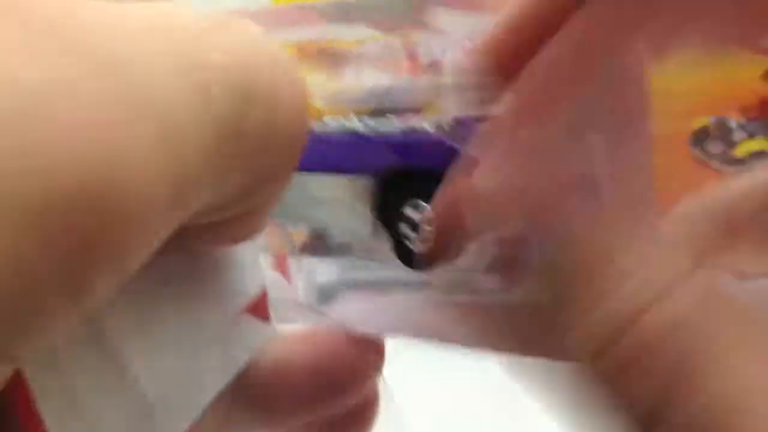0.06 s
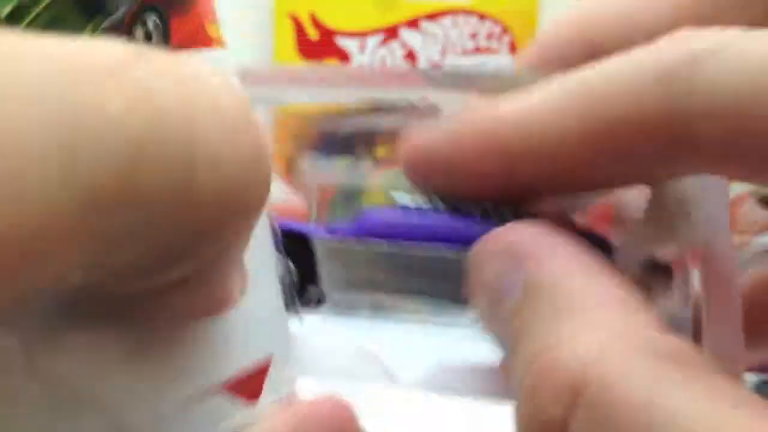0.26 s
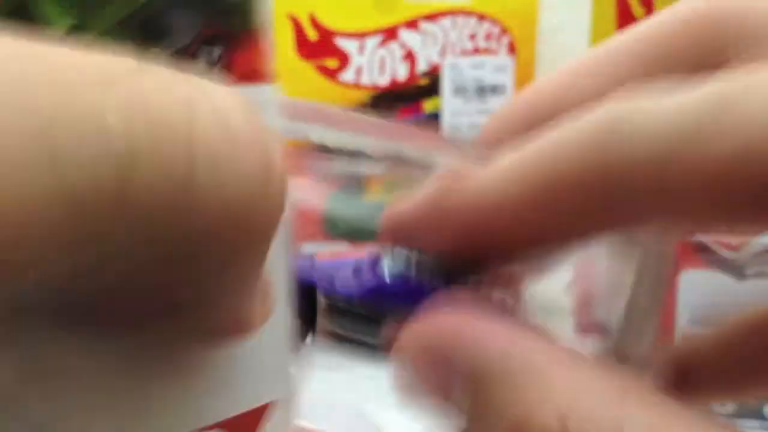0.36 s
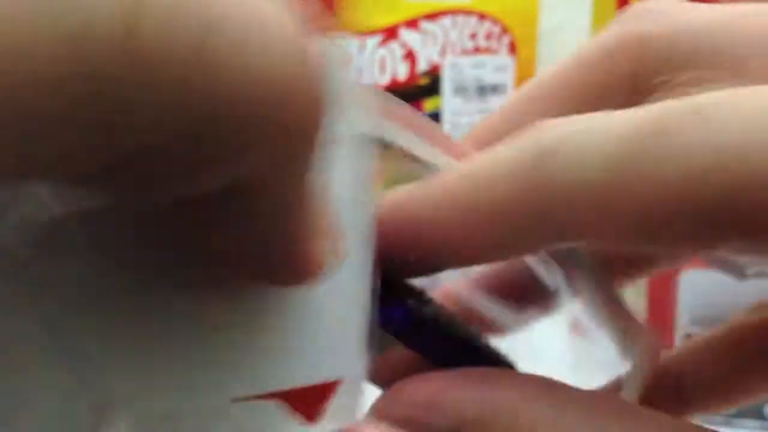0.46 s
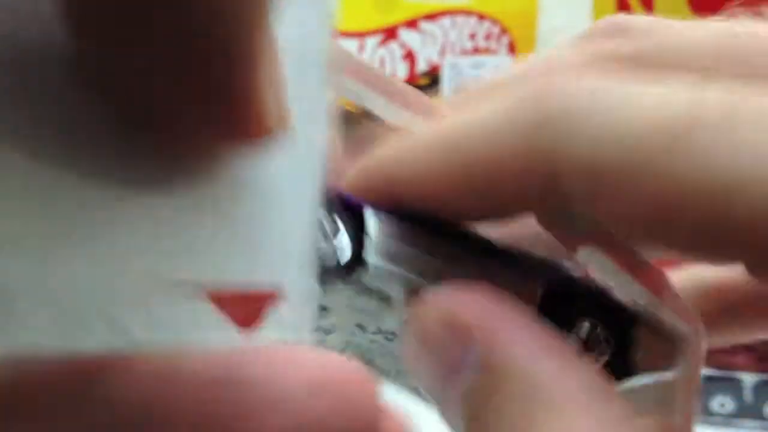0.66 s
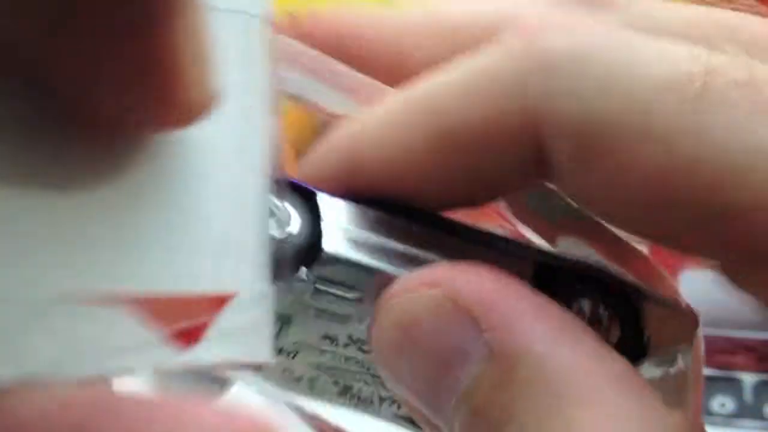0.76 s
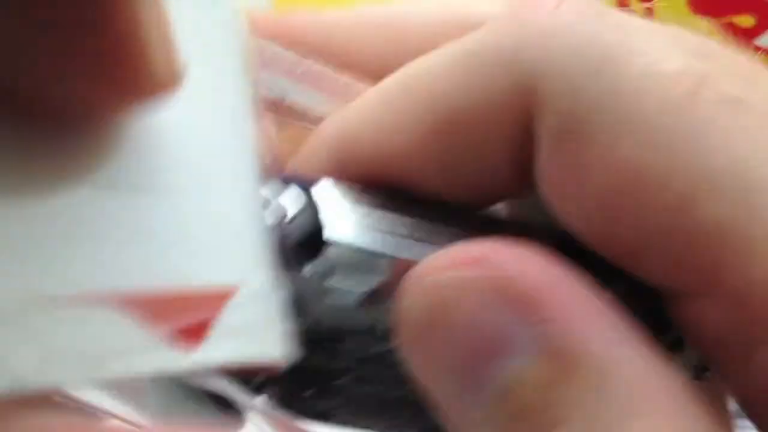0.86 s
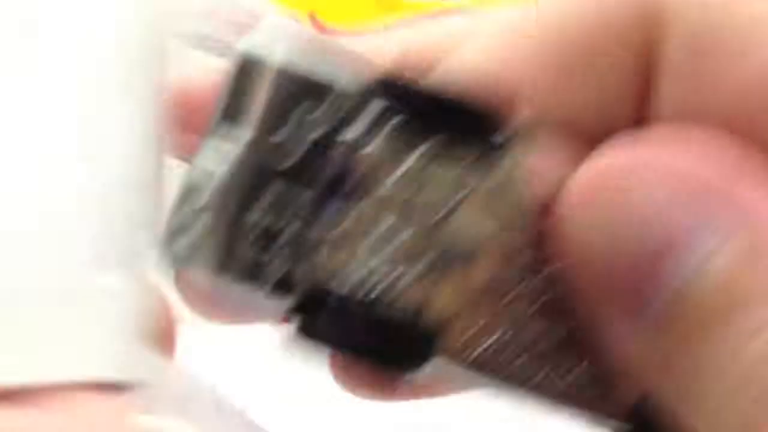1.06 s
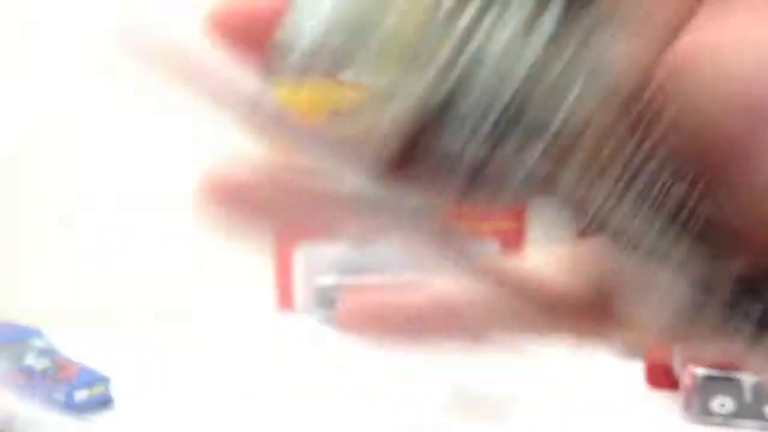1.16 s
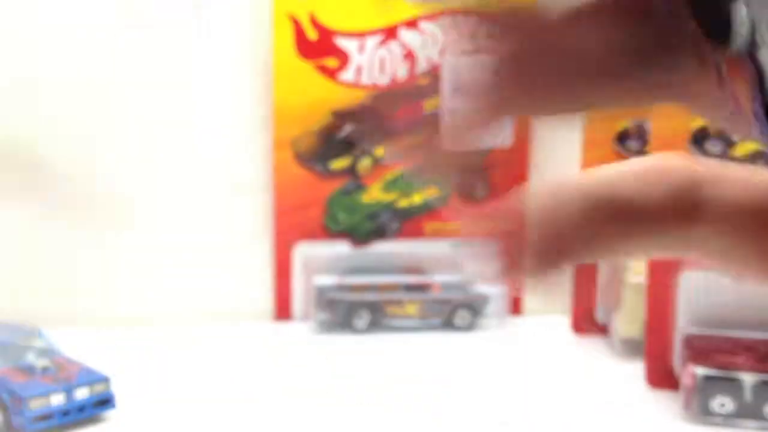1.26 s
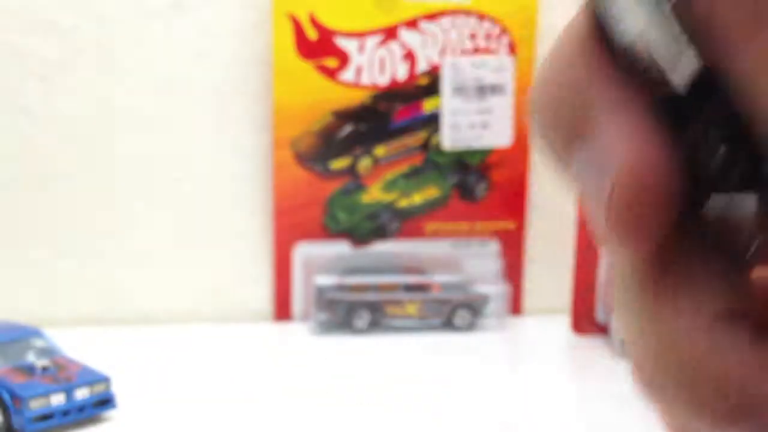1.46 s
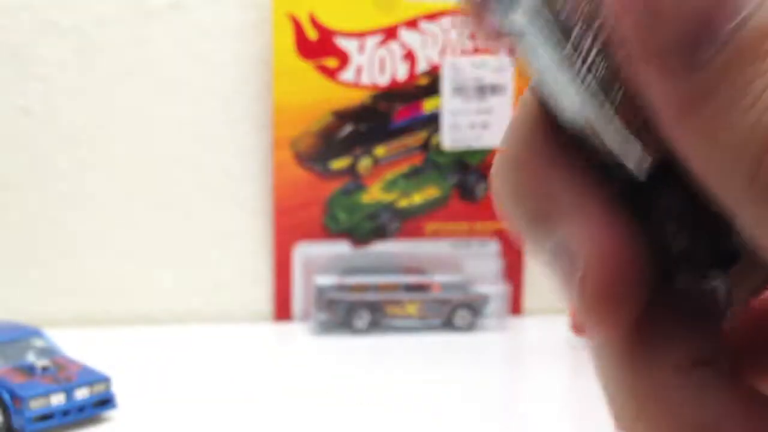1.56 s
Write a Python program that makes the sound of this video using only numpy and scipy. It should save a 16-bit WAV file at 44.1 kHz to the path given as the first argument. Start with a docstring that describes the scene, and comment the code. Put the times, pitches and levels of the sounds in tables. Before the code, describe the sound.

Plastic packaging is cracked open by hand, crackling and popping, then a metal toy car pings.

```python
"""Card and film rustle under the fingers; then a plastic shell snaps off its card and its dents pop. Later come
dry thin clicks, some on the shell and some on a metal toy car, which is also tapped and pings, close by in a
small quiet room. Rustle is many tiny grains mixed with noise, and snaps are noise bursts through the shell's
resonances. Pops and pings are fading sine waves, clicks are thin noise bursts, and taps add a rattling ring. A
short echo tail and faint air noise lie behind them."""
import sys
import numpy as np
from scipy import signal
from scipy.fft import rfft, irfft, next_fast_len
from scipy.io import wavfile
from scipy.ndimage import uniform_filter1d

SR = 44100
rng = np.random.default_rng(int(sys.argv[2]) if len(sys.argv) > 2 else 0)


def volts(x):
    """Linear amplitude factor 10**(x/20) for a level x in dB, scalar or array-like."""
    e = np.asarray(x, float) / 20
    return 10 ** e


def put_to_file(sound):
    """Save the sound as 16-bit audio at rate SR, in the file named by the first command-line argument."""
    columns = np.atleast_2d(sound).T  # one column per channel
    safe = np.clip(columns, -1, 1)
    whole_steps = np.round(safe * 32767)
    wavfile.write(sys.argv[1], SR, whole_steps.astype(np.int16))


N = 70560  # samples, 1.6 s

# The shell breaks: start_s, peak_db, tilt_db_per_octave, burst_t60_s (time to fall 60 dB)
SHELL_SNAPS = [(.2485, -3.5, 2.5, 0.017), (.4248, -5.5, 1, 0.024), (1.051, -16, 5, 0.034),
               (.579, -24, -2, 0.022)]
# Resonances of the stiff shell: centre_hz, width_hz, level_db
SHELL_MODES = [(684, 265, 1.5), (890, 420, -1.5), (1250, 360, -3), (2046, 464, 3), (4500, 1270, -4.5),
               (5670, 1300, -7.5), (7220, 870, -8.5), (7990, 1500, -14.5), (10020, 1400, -15.5),
               (12900, 1700, -21.5)]
# Dents flip over: start_s, peak_db, pitch_hz, fade_cycles (to fall 30 dB)
DENT_POPS = [(0.187, -24.5, 1250, 4), (.239, -19.5, 980, 4.4), (.2486, -3.5, 3950, 12),
             (0.2486, -17.5, 857, 7.7), (0.383, -24.5, 2097, 3.2), (.399, -22.5, 618, 2.8),
             (.425, -13.5, 640, 2.4), (0.4255, -6, 2210, 11.8), (0.4258, -14.5, 1270, 4.4),
             (.473, -14.5, 1355, 6.6), (.574, -30.5, 2040, 21), (0.638, -33, 605, 7.1),
             (0.65, -23, 1420, 9.4), (1.051, -19, 1374, 6.5), (1.058, -23, 1700, 6.4),
             (1.122, -25.5, 210, 3), (1.162, -17.5, 646, 3.5), (1.163, -23, 976, 30),
             (1.163, -21, 1880, 29), (1.165, -26.5, 189, 4.3), (1.46, -35.5, 1320, 4)]
# A dent swells and is stopped by a finger: start_s, peak_db, pitch_hz, length_s
STOPPED_DENTS = [(0.5456, -21.5, 1490, .0052), (0.9759, -14.5, 1234, 0.00426)]
# Dry thin clicks, some on the shell and some on the car: start_s, peak_db, low_edge_hz, t60_s
DRY_CLICKS = [(0.8948, -31, 5000, 0.0068), (1.0444, -23, 2500, .02), (1.0823, -20.5, 3000, 0.015),
              (1.1611, -9.5, 4950, 0.0074), (1.173, -17.5, 3470, 0.007), (1.4598, -31.5, 1490, .007),
              (1.4989, -23.5, 1670, 0.019)]
CLICK_TOP_HZ = 8200
# Fingers drag, bend and tear: start_s, length_s, card_db, film_db
FINGER_STROKES = [(0, 0.41, -54.5, -58), (0.023, 0.014, -44, -54), (0.044, 0.053, -51, -49),
                  (0.151, 0.068, -42.5, -43.5), (0.222, 0.09, -46, -47), (0.314, 0.06, -49.5, -47),
                  (0.379, 0.029, -39.5, -41.5), (0.42, 0.073, -40, -42.5), (0.51, 0.1, -48, -59),
                  (0.571, 0.036, -38.5, -45.5), (0.644, 0.05, -48, -56.5), (0.712, 0.15, -57, -69),
                  (0.842, 0.05, -53.5, -61), (0.902, 0.056, -53, -48), (0.943, 0.085, -45, -45),
                  (1.029, 0.011, -36.5, -39), (1.044, 0.013, -33, -30.5), (1.068, 0.025, -42, -39.5),
                  (1.105, 0.039, -38, -39.5), (1.116, 0.012, -32, -39), (1.156, 0.0059, -31, -44),
                  (1.248, 0.011, -54.5, -43.5), (1.33, 0.022, -77, -40.5), (1.454, 0.021, -51, -57.5),
                  (1.496, 0.039, -46, -52.5), (1.564, 0.016, -57, -54.5)]
STROKE_RISE_S, STROKE_FADE_S = 0.0041, 0.012  # the fade is a time constant
# Colour of the card's creak: pitch_hz, level_db (per Hz)
CARD_COLOUR = [(53, -82), (90, -29.5), (209, 3), (787, -1), (931, 2.5), (1890, 0.5), (2730, -6),
               (3070, -7.5), (5000, -7.5), (6500, -58)]
# Colour of the film's fizz: pitch_hz, level_db (per Hz)
FILM_COLOUR = [(1500, -30.5), (2500, -6.5), (4000, -7), (6600, -3.5), (8600, -7.5), (11000, -5),
               (15100, -9.5), (15600, -41)]
# Small bright ticks of the film: start_s, peak_db, pitch_hz
FILM_TICKS = [(0.0477, -31, 5950), (0.1666, -31.5, 5570), (1.5238, -33.5, 10570)]
TICK_FADE_CYCLES, TICK_SPREAD = 120, 0.15  # cycles to fall 60 dB; spread of the natural log of pitch
# The car is tapped: start_s, crack_peak_db, ring_peak_db
CAR_TAPS = [(1.2527, -16, -22.5), (1.3295, -19.5, -29), (1.3925, -39, -38.5), (1.4005, -40, -42)]
# Ringing tones of the car's body: pitch_hz, level_db
CAR_BODY = [(1400, -7.5), (2140, -3.5), (2520, -2), (3000, -7.5), (3660, -7.5), (4600, 0), (7230, -1.5),
            (8100, -6.5), (8960, -7.5)]
BODY_T60_S, RATTLE_T60_S, CRACK_T60_S, CRACK_LOW_HZ = 0.023, 0.04, 0.008, 1800
# The car's metal is set singing: start_s, peak_db, rub_length_s, tilt_db_per_khz
METAL_PINGS = [(0.485, -32, 0.013, -6), (1.147, -27.5, 0.011, -13), (1.253, -37, 0.012, -1),
               (1.332, -17.5, 0.014, 2)]
# Ringing tones of the metal: pitch_hz, level_db, t60_s
METAL_MODES = [(10090, -13, .18), (11310, 0, .15), (11375, -7, .2), (11620, -16, .13), (10150, -19, .1),
               (14090, -22, .09)]
AFTER_RING_DB = -15  # beside the swell, as the rub ends
# How long the room's tail lasts: pitch_hz, t60_s
ROOM_FADE = [(200, .25), (2000, .2), (6000, .16), (11000, .09)]
ROOM_DB = -16
BASS_CUT_HZ = 134  # small sources radiate little bass
# Colour of the quiet air: pitch_hz, level_db (per Hz)
AIR_COLOUR = [(25, -32), (70, -20), (130, 0), (300, -7.5), (1000, -14.5), (4000, -11.5), (14000, -18),
              (15500, -53)]
AIR_DB = -61.5


def unit(x):
    """Scales a sound to rms 1."""
    return x / np.sqrt(np.mean(x ** 2) + 1e-20)


def peak(x):
    """Scales a sound to peak 1."""
    return x / (np.abs(x).max() + 1e-12)


def along(points, hz):
    """Reads a value between (Hz, value) points, on a log frequency axis."""
    f, v = np.transpose(points)
    return np.interp(np.log(hz + 1), np.log(f + 1), v)


def filtered(x, response):
    """Shapes a sound by a gain and phase given for every frequency."""
    m = next_fast_len(len(x) + 4096)
    return irfft(rfft(x, m) * response(np.fft.rfftfreq(m, 1 / SR)), m)[:len(x)]


def add(track, start_s, sound):
    """Adds a sound to the track at a time, cutting off what runs past the end."""
    part = track[round(start_s * SR):][:len(sound)]
    part += sound[:len(part)]


def shell_response(f):
    """Sums the shell's resonances, each a band-pass, with alternating signs."""
    total = 0
    for k, (centre, width, db) in enumerate(SHELL_MODES):
        band = 1j * f * width / (centre ** 2 - f ** 2 + 1j * f * width)
        total = total + (-1) ** k * volts(db) * band
    return total


def snaps():
    """A short burst of fracture noise rings the stiff shell."""
    out, t = np.zeros(N), np.arange(SR // 10) / SR
    for s, db, tilt_db, t60 in SHELL_SNAPS:
        burst = rng.standard_normal(len(t)) * volts(-60 * t / t60)
        burst[0] += 4  # the first crack
        power = tilt_db / (20 * np.log10(2))  # dB per octave as a power of frequency
        snap = filtered(burst, lambda f: shell_response(f) * (1j * (f + 50) / 2000) ** power)
        add(out, s, volts(db) * peak(snap))
    return out


def pops():
    """Each flipping dent rings a few cycles, with weaker partners below and above its pitch."""
    out, t = np.zeros(N), np.arange(SR // 20) / SR
    for s, db, hz, cycles in DENT_POPS:
        rise = (1 - np.exp(-t * hz / 0.66)) ** 2
        fade = volts(-30 * t * hz / cycles)
        ring = np.sin(2 * np.pi * hz * t)
        ring += 0.19 * np.sin(2 * np.pi * (0.619 * hz * t + rng.random()))
        ring += 0.12 * np.sin(2 * np.pi * (1.664 * hz * t + rng.random()))
        add(out, s, volts(db) * peak(rise * fade * ring))
    return out


def stopped_dents():
    """A dent swells for a few cycles, with a lower and a higher partner, and is cut short."""
    out, t = np.zeros(N), np.arange(SR // 50) / SR
    for s, db, hz, length in STOPPED_DENTS:
        arch = np.sin(np.pi * np.minimum(t / length, 1) ** 1.56)  # late peak, then silence
        ring = np.sin(2 * np.pi * hz * t)
        ring += 0.52 * np.sin(2 * np.pi * 0.57 * hz * t)
        ring -= 0.2 * np.sin(2 * np.pi * 1.57 * hz * t)
        add(out, s, volts(db) * peak(np.sqrt(np.abs(arch)) * ring))
    return out


def thin_burst(t, low_hz, t60):
    """A fading noise burst of peak 1 with its bass and top treble weakened."""
    burst = rng.standard_normal(len(t)) * volts(-60 * t / t60)
    burst[0] += 3

    def response(f):
        low_cut = (1j * f / (low_hz / 2 + 1j * f)) ** 6  # about 6 dB down at low_hz
        return low_cut / (1 + 1j * f / CLICK_TOP_HZ) ** 2
    return peak(filtered(burst, response))


def clicks():
    """Dry thin clicks on the shell or the car, with no ringing body."""
    out, t = np.zeros(N), np.arange(SR // 20) / SR
    for s, db, low_hz, t60 in DRY_CLICKS:
        add(out, s, volts(db) * thin_burst(t, low_hz, t60))
    return out


def crinkle(colour, centre_hz, cycles, spread_db, smooth, count):
    """Short random grains of uneven size on a bed of noise, in one colour."""
    start, pitch, size, phase = rng.random((4, count, 1))
    hz = np.clip(centre_hz * (pitch / (1 - pitch)) ** 0.369, 400, 16000)
    k = np.arange(400)  # samples in a grain
    size_db = spread_db * np.minimum(-np.log(size), 3)  # many small, few large
    fade_db = -60 * k / SR * hz / cycles
    grain = volts(size_db + fade_db) * np.sin(2 * np.pi * (hz * k / SR + phase))
    at = (start * N).astype(int) + k
    grains = np.bincount(at.ravel(), grain.ravel(), N + len(k))[:N]
    # Even out the grains' own colour, then give them the wanted one.
    spectrum = rfft(grains)
    power = uniform_filter1d(np.abs(spectrum) ** 2, size=800)
    white = unit(irfft(spectrum / np.sqrt(np.abs(power) + 1e-9), N))
    mixed = white + smooth * rng.standard_normal(N)
    return unit(filtered(mixed, lambda f: volts(along(colour, f))))


def rustle():
    """Every finger stroke creaks the card and fizzes the film."""
    s, length, card_db, film_db = np.transpose(FINGER_STROKES)[..., None]
    t = np.arange(N) / SR - s
    rise = np.clip(t / STROKE_RISE_S, 0, 1)
    shape = rise * np.exp(-np.maximum(t - length, 0) / STROKE_FADE_S)
    # Overlapping strokes add by power.
    card_level = np.sqrt(np.sum((volts(card_db) * shape) ** 2, axis=0))
    film_level = np.sqrt(np.sum((volts(film_db) * shape) ** 2, axis=0))
    card = crinkle(CARD_COLOUR, centre_hz=1206, cycles=8.4, spread_db=6, smooth=1.0, count=1200)
    film = crinkle(FILM_COLOUR, centre_hz=7000, cycles=14, spread_db=4.5, smooth=0.7, count=3000)
    return card_level * card + film_level * film


def ticks():
    """Each film tick is a cluster of six brief tones round its pitch."""
    out, t = np.zeros(N), np.arange(SR // 50) / SR
    for s, db, hz in FILM_TICKS:
        tones_hz = np.minimum(hz * np.exp(TICK_SPREAD * rng.standard_normal((6, 1))), 15500)
        tones = np.sin(2 * np.pi * (tones_hz * t + rng.random(tones_hz.shape)))
        fade = volts(-60 * t * hz / TICK_FADE_CYCLES)
        add(out, s, volts(db) * peak(tones.sum(axis=0) * fade))
    return out


def taps():
    """A tap gives a thin crack and a ring of the car's body, smeared by a noisy rattle."""
    out, t = np.zeros(N), np.arange(SR // 10) / SR
    for s, crack_db, ring_db in CAR_TAPS:
        ring = np.zeros(len(t))
        for hz, db in CAR_BODY:
            level = volts(db + rng.normal(0, 2.7) - 60 * t / BODY_T60_S)  # no two taps alike
            ring += level * np.sin(2 * np.pi * (hz * t + rng.random()))
        rattle = rng.standard_normal(len(t)) * volts(-60 * t / RATTLE_T60_S)
        ring = signal.fftconvolve(ring, rattle)[:len(t)]
        crack = thin_burst(t, CRACK_LOW_HZ, CRACK_T60_S)
        add(out, s, volts(crack_db) * crack + volts(ring_db) * peak(ring))
    return out


def pings():
    """High metal tones swell under a brief rub, then ring on faintly; close pairs beat."""
    out, t = np.zeros(N), np.arange(SR // 5) / SR
    pivot_hz = METAL_MODES[1][0]  # the tilt leaves this tone unchanged
    for s, db, rub, tilt_db in METAL_PINGS:
        rise = np.minimum(t / rub, 1)
        swell = np.sin(np.pi * rise)
        ping = np.zeros(len(t))
        for hz, mode_db, t60 in METAL_MODES:
            after_ring = volts(AFTER_RING_DB - 60 * (t - rub) / t60) * rise
            level = volts(mode_db + tilt_db * (hz - pivot_hz) / 1000)
            ping += level * np.sin(2 * np.pi * hz * t) * (swell + after_ring)
        add(out, s, volts(db) * peak(ping))
    return out


def room(x):
    """Walls return a short tail of noise, drawn anew for every tenth of a second."""
    out, step = np.zeros(N), SR // 10
    for a in range(0, N, step):
        hz, t, z = signal.stft(rng.standard_normal(SR // 3), SR, nperseg=256)
        fade = volts(-60 * t / along(ROOM_FADE, hz)[:, None])
        tail = signal.istft(z * fade, SR, nperseg=256)[1]
        echo = signal.fftconvolve(x[a:a + step], tail / np.linalg.norm(tail))
        add(out, a / SR + 0.004, echo)  # the tail comes 4 ms late
    return out


def air():
    """Steady noise in the colour of the quiet air."""
    noise = filtered(rng.standard_normal(N), lambda f: volts(along(AIR_COLOUR, f)))
    return volts(AIR_DB) * unit(noise)


def scene():
    """Mixes everything near the hands with its room tail, trims the bass, and adds the air."""
    near = snaps() + pops() + stopped_dents() + clicks() + rustle() + ticks() + taps() + pings()
    near = near + volts(ROOM_DB) * room(near)
    near = filtered(near, lambda f: (1j * f / (BASS_CUT_HZ + 1j * f)) ** 4)
    return (near + air())[None]


def top_cut(x):
    """Nothing passes above the cut-off."""
    return signal.sosfilt(signal.butter(12, 15700, fs=SR, output="sos"), x)


def record(dry):
    """Returns the finished mix as it is heard."""
    return top_cut(dry)


dry = scene()
out = record(dry)
put_to_file(out)
```